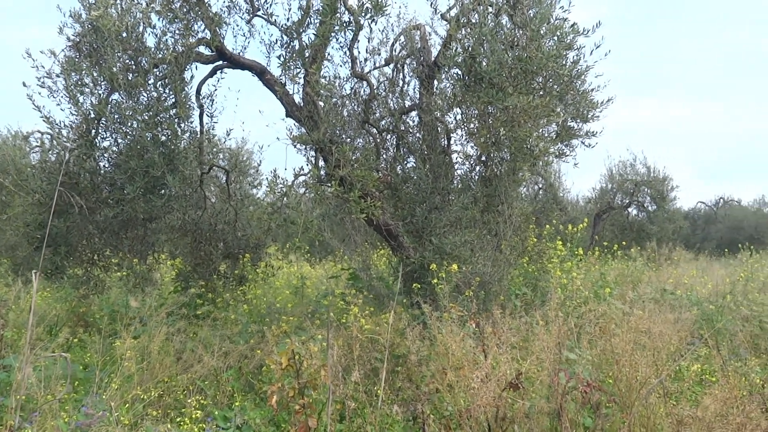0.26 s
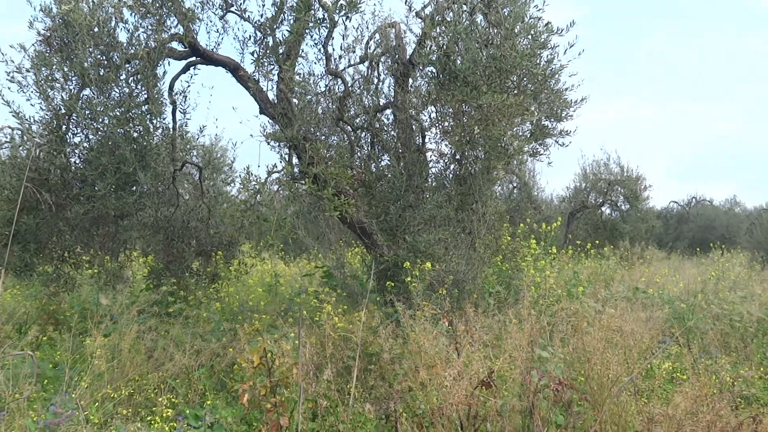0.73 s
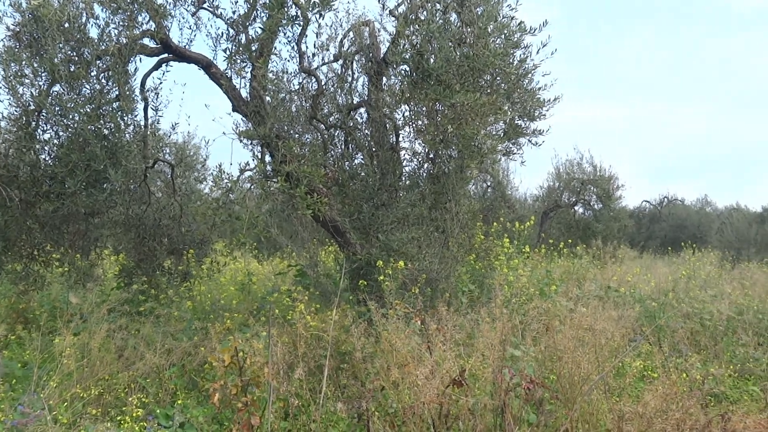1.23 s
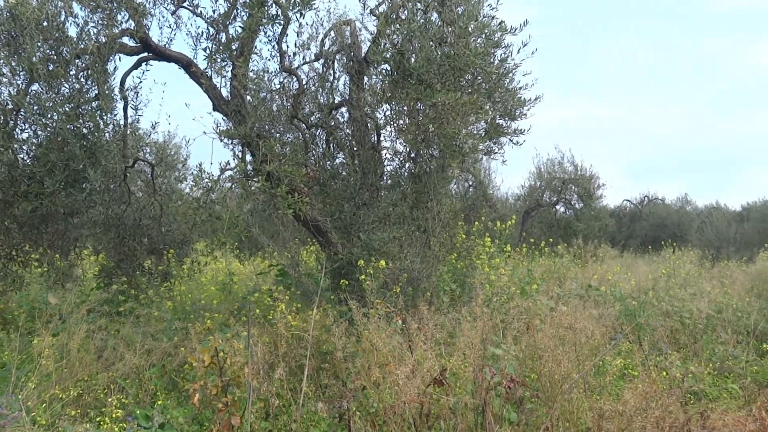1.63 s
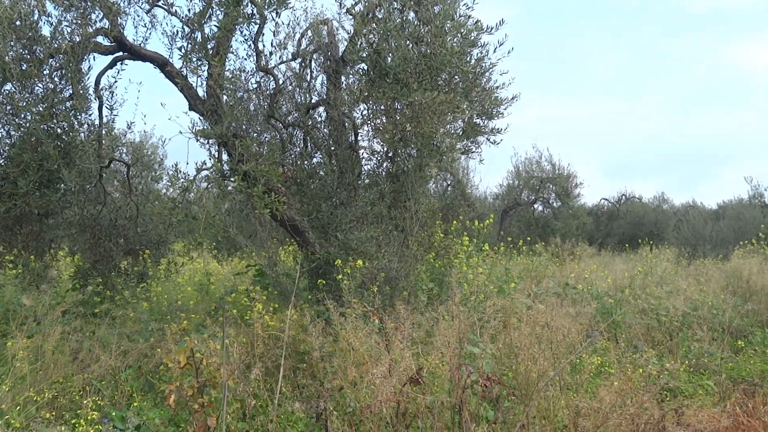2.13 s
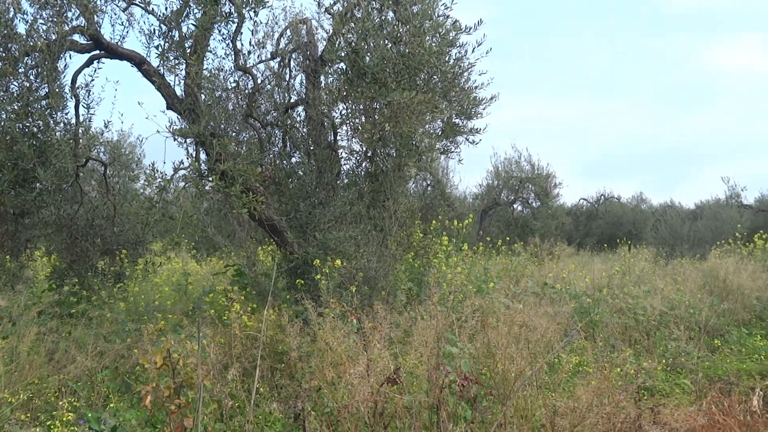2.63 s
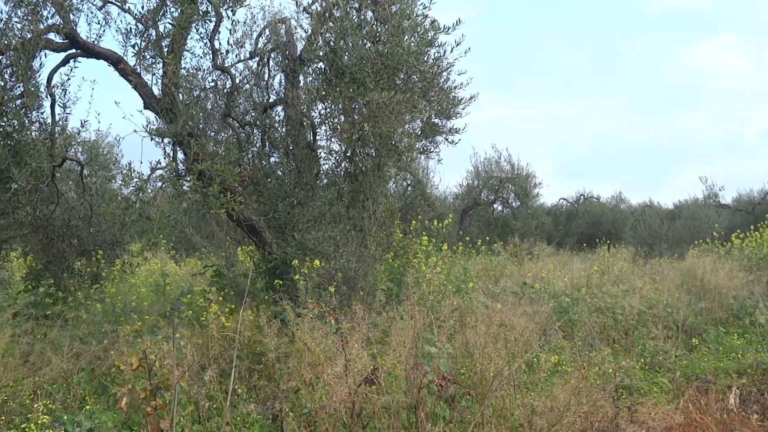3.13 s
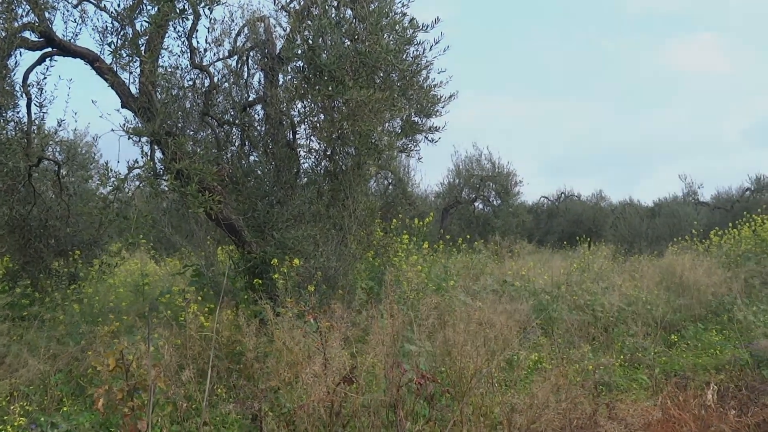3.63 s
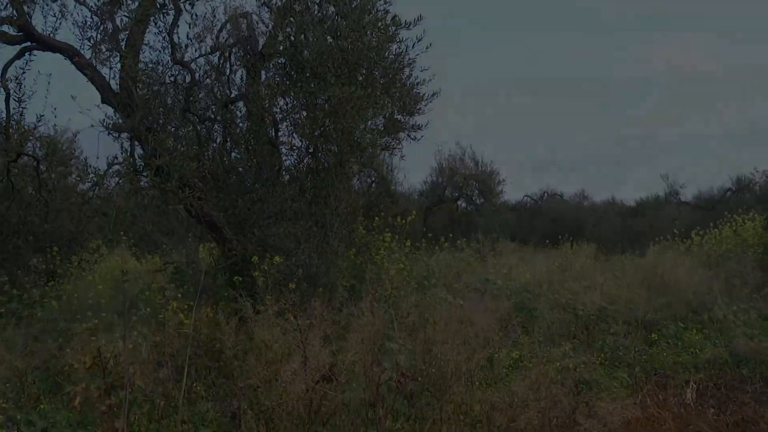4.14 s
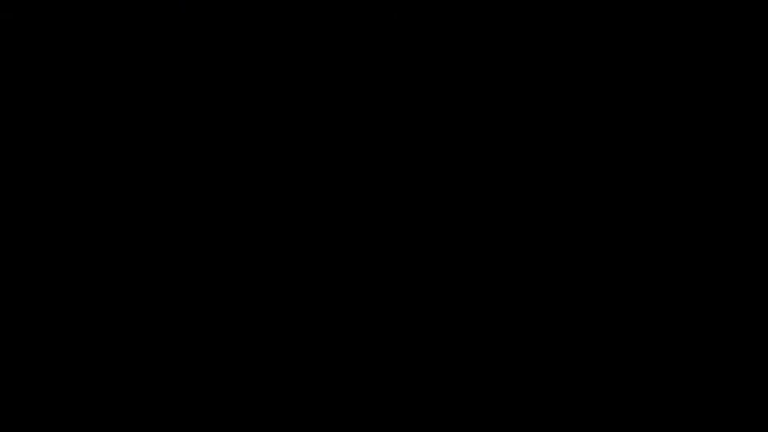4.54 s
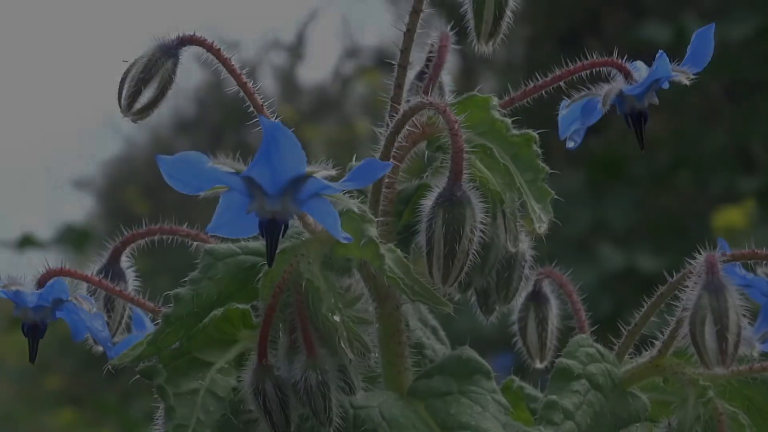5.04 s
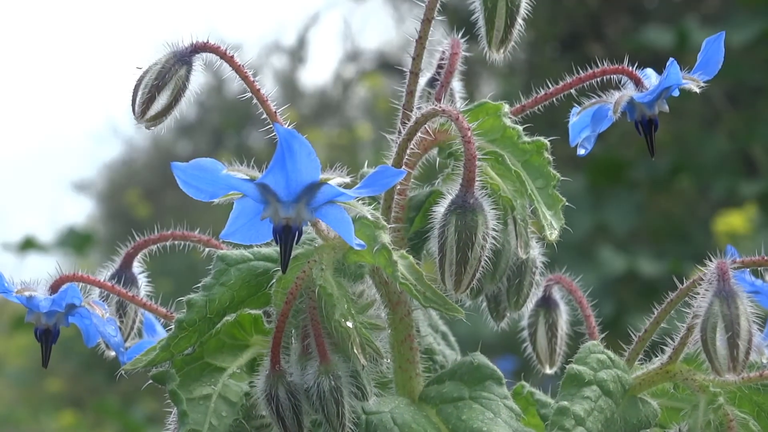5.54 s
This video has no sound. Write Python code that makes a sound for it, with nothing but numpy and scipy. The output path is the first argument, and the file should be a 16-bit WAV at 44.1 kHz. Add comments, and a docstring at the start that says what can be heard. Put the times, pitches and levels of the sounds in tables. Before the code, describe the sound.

Outdoor stereo camera sound in the countryside. Busy, bright birdsong, near whistles and sharp chirps with scattered tree echoes, thins after three seconds and drifts slightly from left to right. It fades out by four and a half seconds with faint handling clicks, then fades in to weak air, a few thin chirps and two tiny dry ticks.

```python
"""Many small birds sing in an olive grove: a low whistler, repeated syllables, buzzes, single chirps
and a far chorus, all voiced as near sines with bending pitch and echoed by sparse random taps.
Shaped noise makes the air of open country; ringing modes make the knocks on a camera shell, and
short decaying sines the dry plant ticks. The birds drift from left to right as the camera turns.
Everything fades to silence and back in, with less bass in the air after the gap."""
import sys
import numpy as np
from scipy import signal
from scipy.io import wavfile
from scipy.ndimage import uniform_filter1d

SR = 44100
rng = np.random.default_rng(int(sys.argv[2]) if len(sys.argv) > 2 else 0)


def generate_wav(sig):
    """Save sig (samples, or channels by samples) to the path in sys.argv[1] as 16-bit PCM at SR."""
    pcm = np.round(np.clip(np.atleast_2d(sig).T, -1, 1) * 32767).astype(np.int16)
    wavfile.write(sys.argv[1], SR, pcm)


N = 255339  # length in samples


def gain_of(db):
    """Decibels to gain."""
    return 10 ** (np.asarray(db) / 20)


def evened(x):
    """Scales to rms 1."""
    return x / np.sqrt(np.mean(x ** 2) + 1e-20)


def add(mix, s, sound):
    """Mixes a sound in at s seconds, cut off at the end of the mix."""
    part = mix[max(round(s * SR), 0):][:len(sound)]
    part += sound[:len(part)]


def along(points, t):
    """Reads every column of a curve at the times t."""
    s, *columns = np.transpose(points)
    return [np.interp(t, s, column) for column in columns]


def drift(samples):
    """Slow random wander of rms 1: noise smoothed twice."""
    smooth = uniform_filter1d(rng.standard_normal(N), round(samples))
    return evened(uniform_filter1d(smooth, round(samples)))


def syrinx(hz, db, edge=.3, overtone_db=-36):
    """The bird's voice: a near sine with a faint octave, softly started and ended."""
    phase = 2 * np.pi * (np.cumsum(hz) / SR + rng.random())
    has_octave = hz < 6000  # higher pitches are pure
    tone = np.sin(phase) + gain_of(overtone_db) * has_octave * np.sin(2 * phase)
    envelope = signal.windows.tukey(len(hz), np.clip(edge, .02, 1))
    return np.sqrt(2) * gain_of(db) * tone * envelope


def chirp(length, first_hz, middle_hz, last_hz, db, edge=0.066, shiver=0):
    """Pitch bends on a parabola through three points and may shiver about it."""
    u = np.linspace(-1, 1, max(round(length * SR), 8))
    slope = (last_hz - first_hz) / 2
    curve = (first_hz + last_hz) / 2 - middle_hz
    hz = middle_hz + u * slope + u ** 2 * curve
    wobble = np.sin(2 * np.pi * 110 * length * u / 2)  # 110 Hz
    return syrinx(hz * (1 + shiver * wobble), db, edge=edge)


def buzz(length, hz, sweep_hz, rate, db):
    """Pitch falls again and again (rises if sweep_hz is negative); each sweep swells and dies."""
    cycle = np.arange(max(round(length * SR), 8)) / SR * rate % 1
    tone = syrinx(hz + sweep_hz * (.5 - cycle), db, edge=0.66)
    return tone * np.sin(np.pi * cycle) ** 0.2


def grove(x, t60, start_s=.004):
    """Trunks and leaves scatter sound back: sparse taps of random sign, other ones per ear."""
    size, spacing = SR // 2, 20  # samples
    first = np.arange(round(start_s * SR), size - spacing, spacing)
    taps = np.zeros((2, size))
    at = first + rng.integers(0, spacing, (2, len(first)))
    np.put_along_axis(taps, at, rng.choice([-1., 1.], at.shape), 1)
    taps[1] = 0.71 * taps[0] + 0.5 * taps[1]  # the two ears lie close together
    taps *= gain_of(-60 * np.arange(size) / SR / t60)
    taps /= np.linalg.norm(taps, axis=1, keepdims=True)
    return signal.oaconvolve(x[None], taps, axes=1)[:, :N]


def singers(band_hz, count, sweep, spread_db, buzzy):
    """Unordered quick chirps and buzzes of uneven strength, scaled to rms 1."""
    out = np.zeros(N)
    low_hz, high_hz = band_hz
    for when, length, pitch, fall, bend, size, kind in rng.random((count, 7)):
        hz = low_hz * (high_hz / low_hz) ** pitch
        db = -spread_db * np.log(1 - .95 * size)
        direction = np.sign(bend - .3)  # most notes fall, some rise
        half = hz * sweep * (0.16 + fall) * direction / 2
        if kind < buzzy:
            note = buzz(0.0087 + 0.016 * length, hz, 2 * half, 70 + 100 * bend, db)
        else:
            middle_hz = hz * (1 + 0.13 * (kind - .5))
            note = chirp(0.005 + 0.014 * length ** 2, hz + half, middle_hz, hz - half, db)
        add(out, when * N / SR, note)
    return evened(out)


# How strongly the far birds come through over time:
# [t/s, level of low singers/dB, level of high singers/dB]
CHORUS_LEVELS = [(0, -47.5, -47), (2.45, -44, -57.5), (2.75, -49, -54), (3.2, -47.5, -65.5),
                 (4.2, -50.5, -61.5), (4.45, -42, -59.5), (4.82, -51.5, -57.5), (4.95, -61, -84),
                 (5.35, -64.5, -63), (5.5, -48, -54), (5.65, -55.5, -85)]


def chorus():
    """Distant birds in a low and a high band, heard both directly and by their echoes."""
    low_db, high_db = along(CHORUS_LEVELS, np.arange(N) / SR)
    low = singers((2901, 5827), count=800, sweep=0.17, spread_db=1.5, buzzy=.3)
    high = singers((5850, 8330), count=650, sweep=0.3, spread_db=4.5, buzzy=0.4)
    far = gain_of(low_db) * low + gain_of(high_db) * high
    return gain_of(-3.5) * far + gain_of(-4) * grove(far, t60=.3)


# Tone colour of the open air, only its shape counts: [f/Hz, relative level per Hz/dB]
AIR_COLOUR = [(100, -29), (300, -14.5), (1100, -12), (1900, -18.5), (4000, -9.5), (9000, -21.5),
              (15600, -45)]
AIR_DB, THIN_AIR_FROM_S = -61.5, 4.57  # overall rms level; time when the air loses bass


def air():
    """Wind in the leaves and far traffic: noise with drifting patches, thinner late on."""
    frames, hz = N // 256 + 5, np.fft.rfftfreq(1024, 1 / SR)
    a, b, c, d, patches = rng.standard_normal((frames, 513, 5)).T
    # smooth over pitch, then over time
    patches = evened(uniform_filter1d(uniform_filter1d(patches, 8, 0), 16, 1))
    f, db = np.transpose(AIR_COLOUR)
    colour_db = np.interp(np.log(hz + 1), np.log(f + 1), db)[:, None]
    # stereo width, widest from 400 to 1000 Hz
    width = np.where((hz > 400) & (hz < 1000), .6, .2)[:, None]
    middle, side = a + 1j * b, width * (c + 1j * d)
    spectrum = np.array([middle + side, middle - side]) * gain_of(colour_db + 1.5 * patches)
    # late air falls 4.5 dB per octave below 700 Hz, down to 210 Hz
    bass_loss_db = 4.5 * np.log2(np.clip(hz / 700, .3, 1))[:, None]
    late = np.arange(frames) * 256 / SR > THIN_AIR_FROM_S
    spectrum *= gain_of(bass_loss_db * late)
    noise = signal.istft(spectrum, nperseg=1024, noverlap=768)[1][:, :N]
    return gain_of(AIR_DB) * evened(noise)


# Low whistled notes:
# [t/s, length/s, first f/Hz, middle f/Hz, last f/Hz, starting level/dB, level change to the end/dB,
#  warble depth/0-1]
WHISTLE_NOTES = [(0.013, 0.082, 2084, 2068, 2126, -55, 11.5, 0.13),
                 (0.097, 0.16, 2060, 1898, 1774, -55.5, 3, 0.48),
                 (0.381, 0.1, 2097, 2019, 1910, -41.5, 4.5, 0), (0.492, 0.075, 1944, 1985, 1957, -38, 2, 0),
                 (0.576, 0.079, 1956, 1967, 1960, -35, 0, 0), (0.835, 0.12, 2330, 2520, 2480, -45, -6, 0.8),
                 (.875, .1, 1980, 1930, 1780, -50, 3, .9), (1.13, 0.057, 1914, 2059, 2200, -43, 7.5, 0.2),
                 (1.224, 0.044, 2225, 2157, 2300, -36, 2, 0), (1.26, 0.19, 2187, 3013, 3600, -35, -6, 0.46),
                 (1.617, 0.072, 1530, 1755, 1806, -56.5, 8, 0.54),
                 (1.768, 0.11, 1842, 1813, 1777, -43, 4.5, 0),
                 (2.055, .15, 1962, 2300, 2054, -37.5, -1.5, 0.69),
                 (2.431, .11, 2030, 2100, 1850, -40.5, -1, 0.83),
                 (2.619, 0.112, 2085, 2230, 1950, -38.5, 6, 0.7),
                 (2.854, 0.061, 2462, 2258, 1900, -36, 1.5, 0.23),
                 (2.932, 0.14, 2440, 2329, 2192, -34.5, -2, 0),
                 (3.684, 0.043, 2365, 2505, 2410, -45, -5.5, .1),
                 (3.732, 0.043, 2370, 2483, 2355, -44, 4, 0.48),
                 (3.786, 0.075, 2410, 2370, 2320, -44.5, -5, 0.7), (3.98, .3, 2400, 2320, 2120, -61, 4, .6)]
WHISTLE_EDGE, WARBLE_HZ = 0.26, 75  # share of a note spent rising and falling; pulse rate


def whistler():
    """Low notes that swell or sag; warbled ones pulse unevenly."""
    out = np.zeros(N)
    steady_phase = 2 * np.pi * WARBLE_HZ * np.arange(N) / SR
    pulse = np.cos(steady_phase + 2.2 * drift(300))
    for s, *note, change_db, warble in WHISTLE_NOTES:
        tone = chirp(*note, edge=WHISTLE_EDGE)
        swell = gain_of(np.linspace(0, change_db, len(tone)))
        note_pulse = pulse[round(s * SR):][:len(tone)]
        add(out, s, tone * swell * (1 + warble * note_pulse))
    return out


# Single high notes: [t/s, length/s, first f/Hz, middle f/Hz, last f/Hz, level/dB]
CHIRP_NOTES = [(0.024, 0.018, 3280, 3590, 3100, -40.5), (0.081, 0.046, 8050, 6900, 6840, -41),
               (0.308, 0.02, 5820, 6190, 5600, -41.5), (0.408, 0.011, 5160, 5900, 5900, -39),
               (0.764, 0.026, 6100, 6150, 5700, -40), (0.845, 0.022, 7240, 7980, 7850, -43),
               (1.117, 0.047, 7200, 7480, 7430, -39), (1.431, 0.013, 8600, 7870, 8040, -39),
               (1.606, 0.012, 7300, 7250, 6850, -31.5), (1.663, 0.028, 8400, 7740, 7900, -40),
               (1.816, 0.034, 9430, 8100, 7700, -43.5), (1.868, 0.025, 5450, 5410, 5350, -39),
               (2.231, 0.045, 8360, 7370, 7130, -39), (2.509, 0.034, 5260, 5700, 5900, -34.5),
               (2.608, 0.063, 7420, 5780, 5140, -41.5), (3.248, 0.07, 4850, 5650, 5450, -42),
               (3.44, 0.053, 5750, 6350, 6390, -46), (3.693, 0.056, 6430, 5270, 2870, -43.5),
               (4.09, 0.031, 6350, 7080, 7000, -51), (4.891, 0.015, 4800, 4630, 4240, -50),
               (5.143, 0.078, 4550, 5000, 4320, -57.5), (5.328, 0.086, 5280, 5080, 4830, -52),
               (5.363, 0.11, 6100, 6160, 6040, -58.5), (5.734, 0.083, 4900, 5640, 4990, -57),
               (5.748, 0.032, 4020, 4650, 4000, -55)]


def single_chirps():
    """Lone notes whose bending pitch shivers slightly."""
    out = np.zeros(N)
    for s, *note in CHIRP_NOTES:
        add(out, s, chirp(*note, shiver=.016))
    return out


# Pitch shapes by name: [length/s, loudest place/0-1, repeat rate/Hz, list of f/Hz at even steps]
SYLLABLE_SHAPES = {"arch": (.03, .55, 15.9, [3450, 4050, 4150, 3500, 3250]),
                   "drop": (.028, .5, 12.2, [4200, 3620, 3500, 3200, 2550]),
                   "flick": (.042, .62, 16.7, [6500, 9000, 5000, 5150, 5600, 6250, 6400, 6350]),
                   "slide": (.138, .25, 4.5, [5800, 4450, 3300, 2550, 2100]),
                   "swoop": (.065, .8, 14.8, [9000, 6800, 4950, 5250, 5550]),
                   "fall": (.022, .55, 17, [8000, 7250, 6600]), "dip": (.032, .7, 17.5, [7100, 6500, 6000]),
                   "vee": (.013, .45, 22, [9000, 6200, 7700, 9500]),
                   "hook": (.03, .65, 16, [5070, 5600, 5750]),
                   "crown": (.03, .4, 14, [4750, 5200, 5150, 5050]),
                   "dive": (.024, .4, 60, [7200, 6400, 5300]),
                   "plunge": (.016, .55, 28, [8900, 6600, 5500]), "tip": (.012, .4, 15.5, [6450, 6150]),
                   "blip": (.01, .5, 21.5, [6900, 7400, 7200])}
# Phrases of one syllable: [syllable, first t/s, last t/s (only if repeated), centre level/dB]
PHRASES = [("arch", .342, 1.41, -40.5), ("drop", .156, .295, -38), ("drop", .63, .696, -40),
           ("drop", 2.31, 2.382, -42), ("drop", 2.458, 2.97, -42), ("drop", 3.066, -46),
           ("drop", 3.236, 3.55, -47.5), ("drop", 3.652, 3.785, -51), ("swoop", .53, .665, -46),
           ("flick", 1.919, 2.039, -38.5), ("fall", 1.934, 2.052, -41.5), ("vee", 2.311, 2.452, -37.5),
           ("blip", 2.344, 2.436, -34.5), ("hook", 2.245, 2.425, -45.5), ("hook", 3.075, 3.209, -46.5),
           ("crown", 3.338, 3.488, -40.5), ("crown", 3.598, 3.733, -47.5), ("dip", 4.15, 4.435, -48.5),
           ("slide", 1.47, 1.688, -45), ("slide", 3.892, 4.13, -50), ("slide", 4.322, -48.5),
           ("arch", .1, -45), ("fall", .919, -38), ("dive", 1.342, 1.358, -38), ("blip", 1.397, -35),
           ("blip", 1.508, 1.553, -40), ("plunge", 1.585, -40), ("dip", 1.675, -38), ("vee", 1.687, -39),
           ("blip", 1.754, -39), ("vee", 1.764, -41), ("plunge", 2.114, 2.149, -38), ("tip", .28, -42),
           ("fall", 2.612, -41), ("tip", 3.088, 3.217, -46), ("dive", 3.63, -41), ("crown", 4.252, -45),
           ("slide", 4.355, -49), ("dive", 4.8, -43), ("dive", 5.522, -46)]
SWELL_DB = -28  # level lost one whole length away from the loudest place


def repeated_syllables():
    """Syllables alone or in rows, each a little higher or lower, louder or softer."""
    out = np.zeros(N)
    for name, first, *repeated, db in PHRASES:
        last = max([first] + repeated)
        length, loudest, rate_hz, pitches_hz = SYLLABLE_SHAPES[name]
        u = np.linspace(0, 1, round(length * SR))
        hz = np.interp(u, np.linspace(0, 1, len(pitches_hz)), pitches_hz)
        hz = uniform_filter1d(hz, 90)  # round the corners
        swell_db = SWELL_DB * (u - loudest) ** 2
        for s in np.linspace(first, last, round((last - first) * rate_hz) + 1):
            sung_hz = hz * (1 + .008 * rng.standard_normal())
            sung_db = db + 2 * rng.standard_normal() + swell_db
            add(out, s, syrinx(sung_hz, sung_db, edge=0.25))
    return out


# Buzzy notes: [t/s, length/s, centre f/Hz, sweep rate/Hz, level/dB]
BUZZ_NOTES = [(0.235, 0.038, 7760, 117, -42), (0.349, 0.055, 7850, 170, -43.5),
              (0.976, 0.1, 7480, 79, -42.5), (3.885, 0.053, 7550, 110, -48), (5.482, 0.037, 7000, 190, -48)]


def buzzes():
    """Fast chains of falling sweeps."""
    out = np.zeros(N)
    for s, length, hz, rate, db in BUZZ_NOTES:
        add(out, s, buzz(length, hz, 0.16 * hz, rate, db))
    return out


# Ringing modes of the camera shell: [f/Hz, level/dB, t60/s]
SHELL_MODES = [(654, -29, 0.035), (914, -21.5, 0.057), (1188, -6.5, 0.02), (2435, -10.5, 0.019),
               (3630, -2, 0.0015)]
# Knocks on the shell: [t/s, level/dB, hardness/dB per octave, rattle length/s]
SHELL_KNOCKS = [(1.047, -19, -3.5, 0.0075), (3.971, -35.5, 13, 0.0038), (4.289, -33, 7, 0.00875),
                (4.48, -29, -15, 0.038), (4.727, -52, 8.5, 0.0037)]


def camera_knocks():
    """A short rattle of taps rings the camera shell; harder knocks favour the upper modes."""
    out, t = np.zeros(N), np.arange(3000) / SR
    for s, db, hard_db, length in SHELL_KNOCKS:
        ring = np.zeros(len(t))
        for hz, mode_db, t60 in SHELL_MODES:
            tilt_db = hard_db * np.log2(hz / 1000)
            ring += gain_of(mode_db + tilt_db - 60 * t / t60) * np.sin(2 * np.pi * hz * t)
        rattle = np.zeros(round(length * SR) + 2)
        rattle[rng.integers(0, len(rattle), size=5)] = rng.uniform(-1.22, 1.0, size=5)
        rattle[0] = 1
        add(out, s, gain_of(db) * np.convolve(rattle, ring))
    return out


# Dry plant ticks: [t/s, f/Hz, level/dB]
PLANT_TICKS = [(5.275, 10500, -33), (5.292, 7800, -33)]


def plant_ticks():
    """Tiny sines with a sharp attack that die away in about a millisecond."""
    out, t = np.zeros(N), np.arange(3000) / SR
    for s, hz, db in PLANT_TICKS:
        attack = 1 - np.exp(-t / 0.000076)
        add(out, s, gain_of(db - 60 * t / 0.0014) * np.sin(2 * np.pi * hz * t) * attack)
    return out


# Where the singers sit as the camera turns: [t/s, left over right level/dB]
TURN_BALANCE = [(0, 1.5), (3.2, 1.1), (3.9, -1.5), (5.79, -3)]


def scene():
    """Near singers with their echoes, the chorus, air, knocks and ticks in stereo."""
    far, background, low = chorus(), air(), whistler()
    high = single_chirps() + repeated_syllables() + buzzes()
    high = high * (1 + 0.4 * drift(70))  # moving leaves on the way break the notes up
    branch_echo = gain_of(-9) * grove(high, t60=0.026)
    trunk_echo = gain_of(-10.0) * grove(high, t60=0.87)
    wavering_low = low * (0.78 + 0.6 * drift(130))
    low_echo = gain_of(-6.0) * grove(wavering_low, t60=1.0)
    birds = low + low_echo + high + branch_echo + trunk_echo + far
    pan_db = along(TURN_BALANCE, np.arange(N) / SR)[0] / 2
    # so small a shell radiates no bass, and the plastic is dull on top; ticks share the band
    band = signal.butter(4, [600, 12000], "band", fs=SR, output="sos")
    handling = signal.sosfilt(band, camera_knocks() + plant_ticks())
    handling = handling * gain_of([[1.5], [-1.5]])  # a little to the left
    return birds * gain_of([pan_db, -pan_db]) + background + handling


# Fade to silence and back in: [t/s, gain/0-1]
FADE_CURVE = [(3.6, 1), (4.552, 0), (4.587, 0), (5.55, 1)]


def record(dry):
    """Fades everything out and in, then removes the treble above 15.7 kHz."""
    faded = dry * along(FADE_CURVE, np.arange(N) / SR)[0]
    lowpass = signal.firwin(511, 15700, window=("kaiser", 9), fs=SR)
    return signal.oaconvolve(faded, lowpass[None], "same")


dry = scene()
out = record(dry)
generate_wav(out)
```